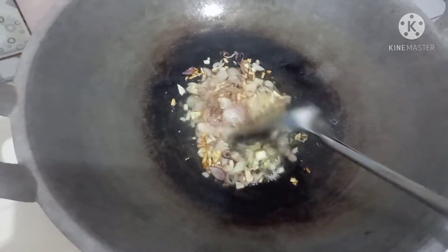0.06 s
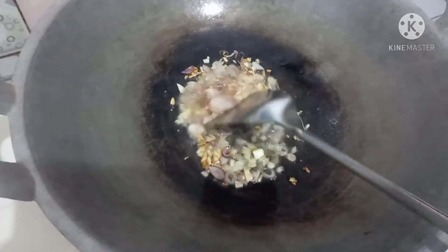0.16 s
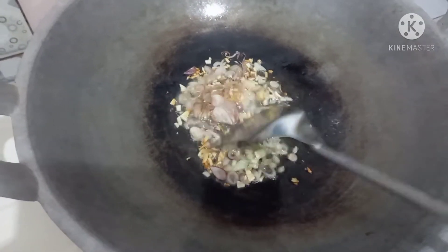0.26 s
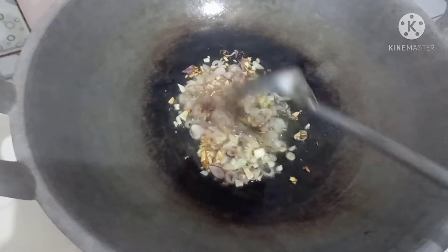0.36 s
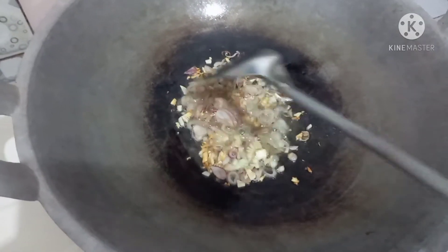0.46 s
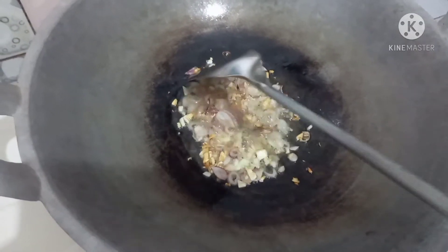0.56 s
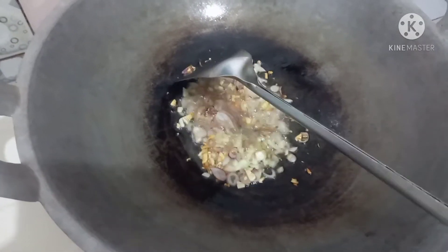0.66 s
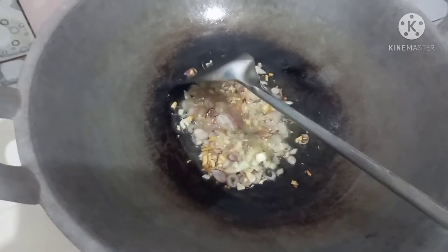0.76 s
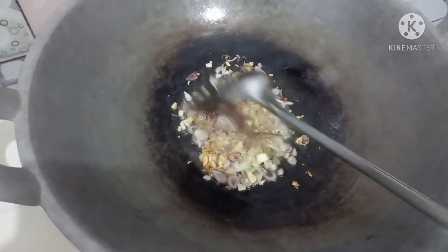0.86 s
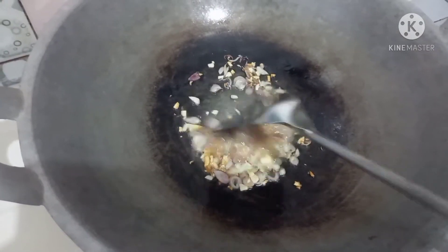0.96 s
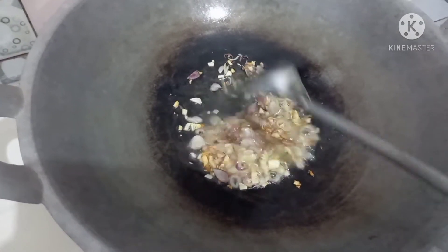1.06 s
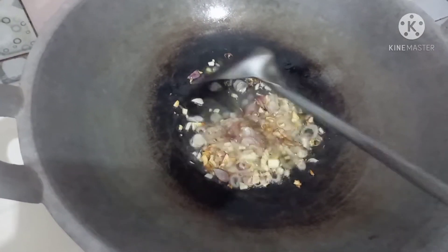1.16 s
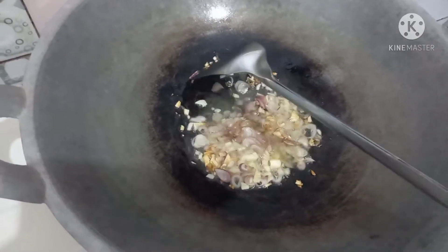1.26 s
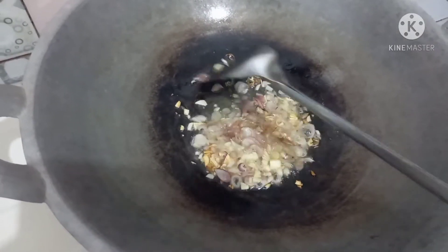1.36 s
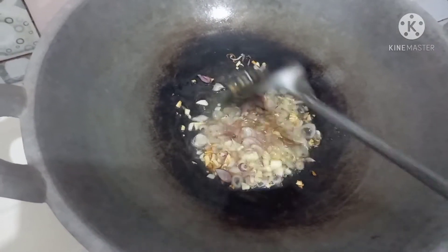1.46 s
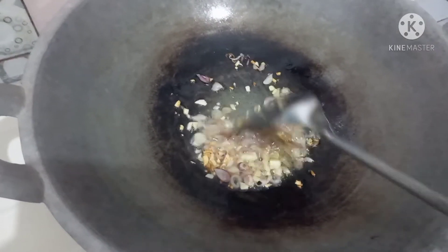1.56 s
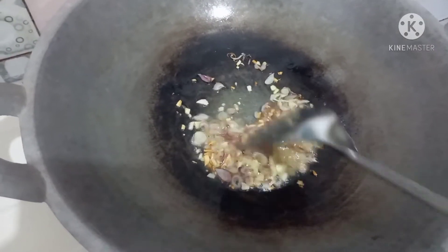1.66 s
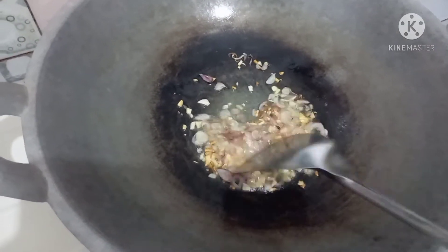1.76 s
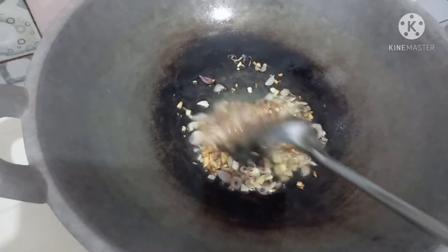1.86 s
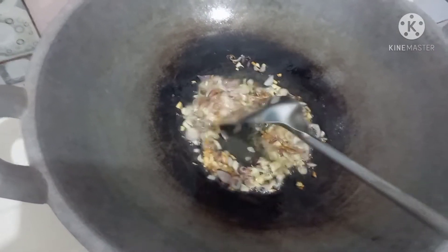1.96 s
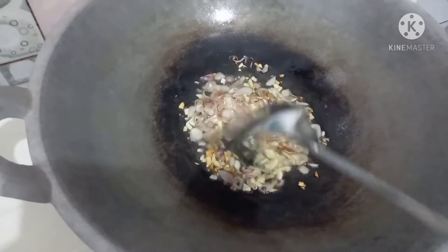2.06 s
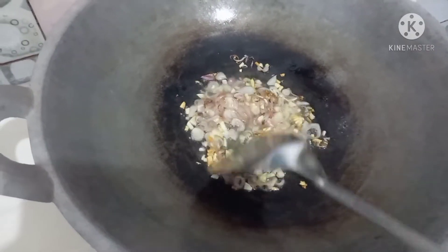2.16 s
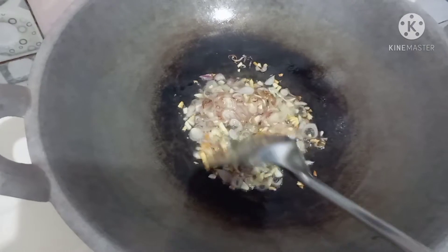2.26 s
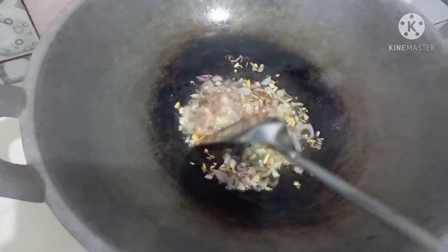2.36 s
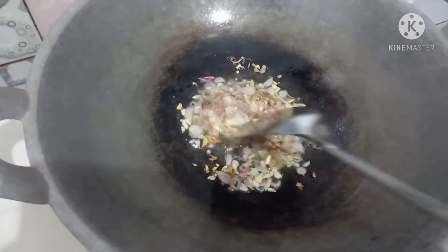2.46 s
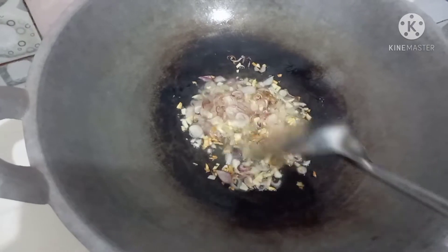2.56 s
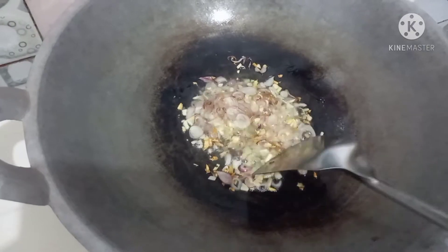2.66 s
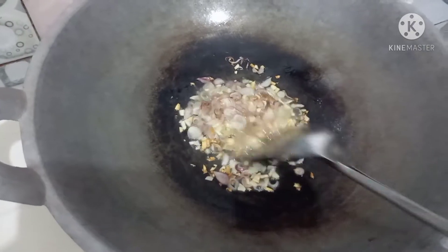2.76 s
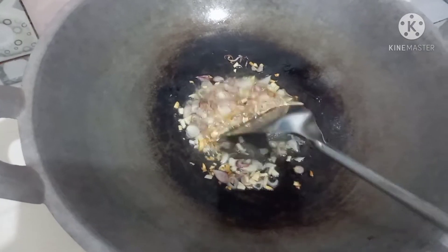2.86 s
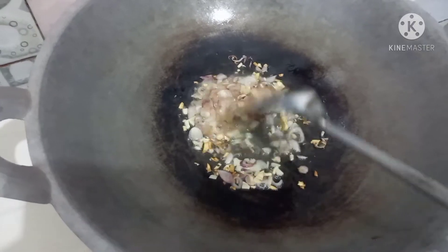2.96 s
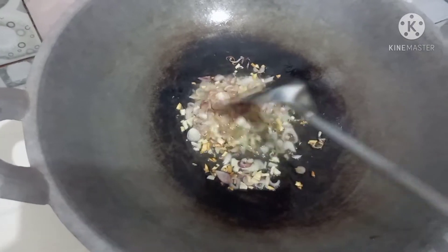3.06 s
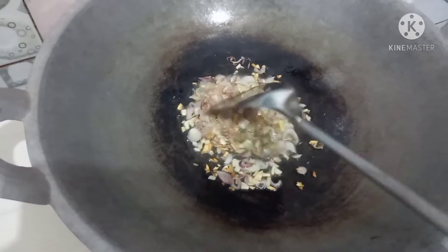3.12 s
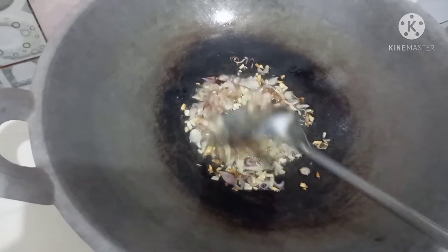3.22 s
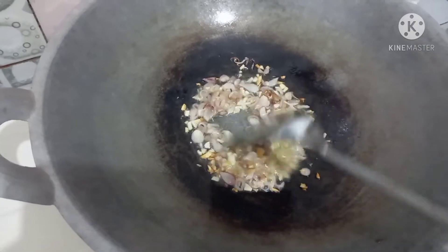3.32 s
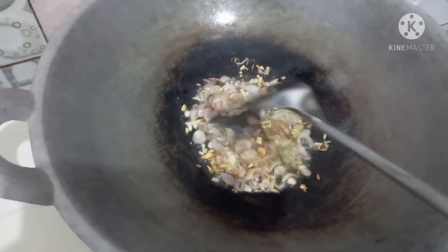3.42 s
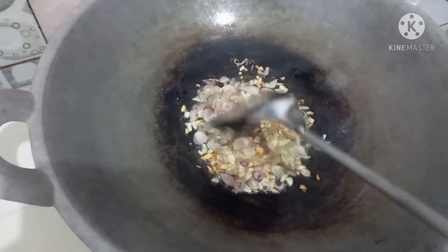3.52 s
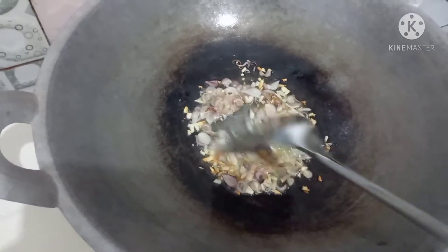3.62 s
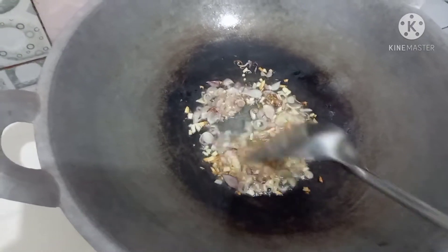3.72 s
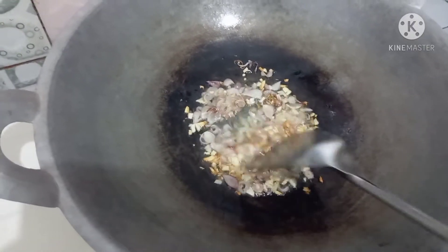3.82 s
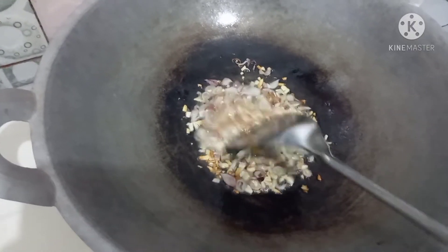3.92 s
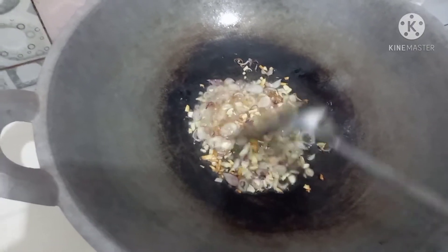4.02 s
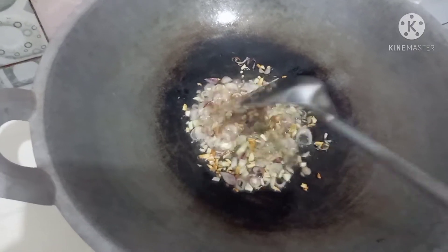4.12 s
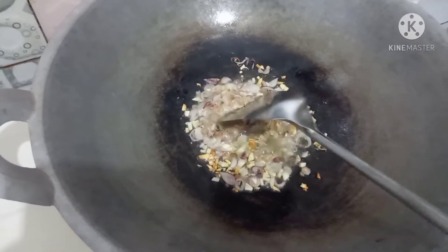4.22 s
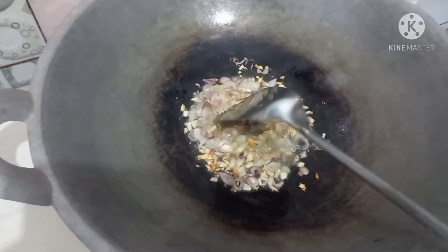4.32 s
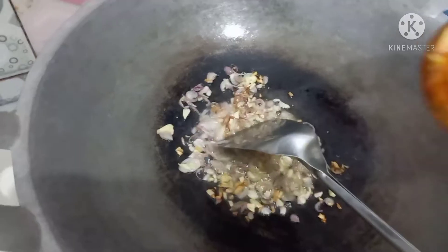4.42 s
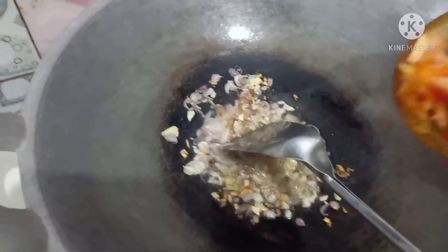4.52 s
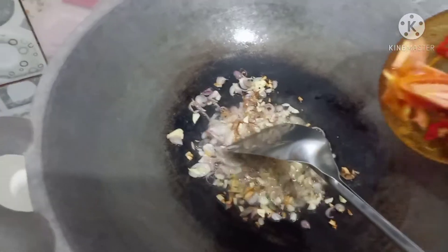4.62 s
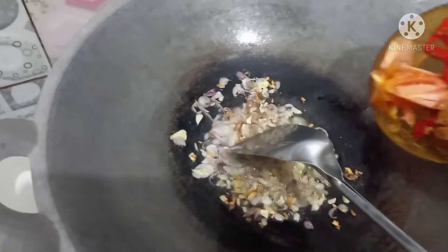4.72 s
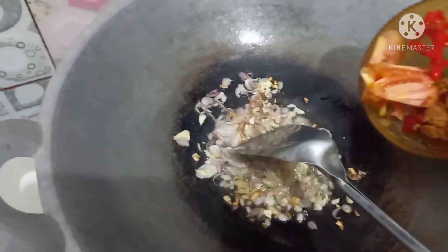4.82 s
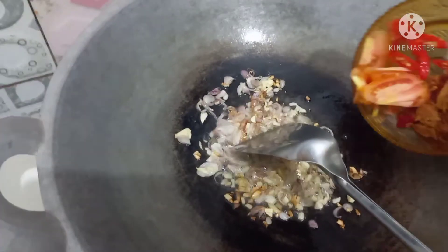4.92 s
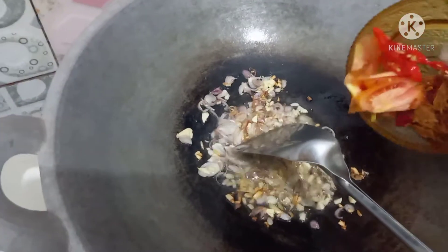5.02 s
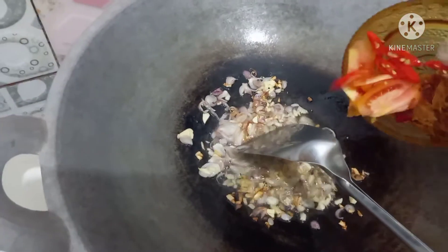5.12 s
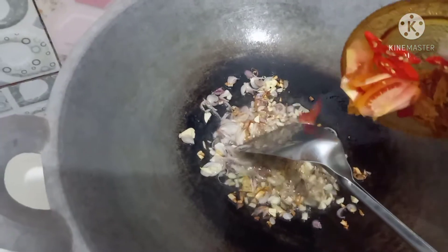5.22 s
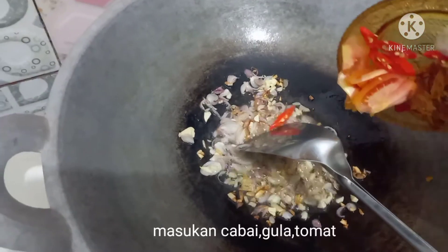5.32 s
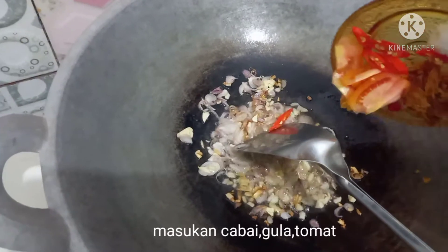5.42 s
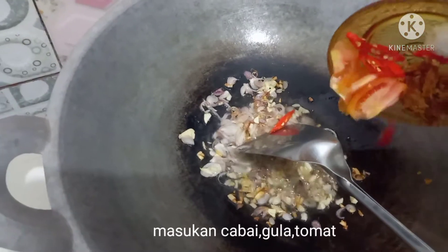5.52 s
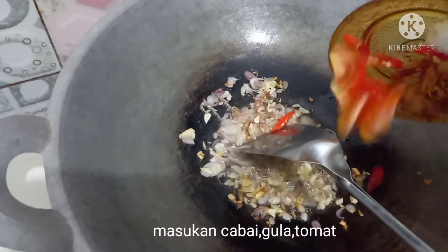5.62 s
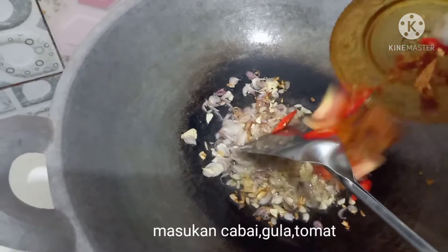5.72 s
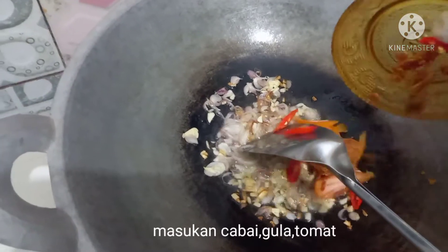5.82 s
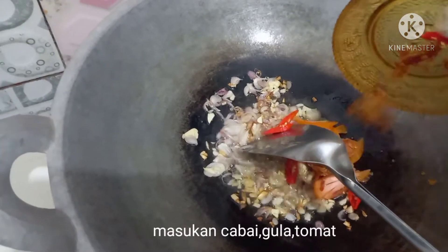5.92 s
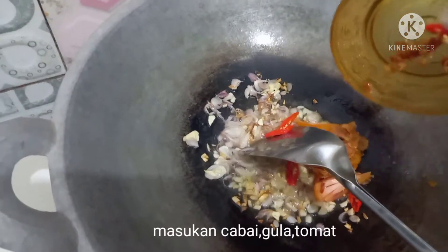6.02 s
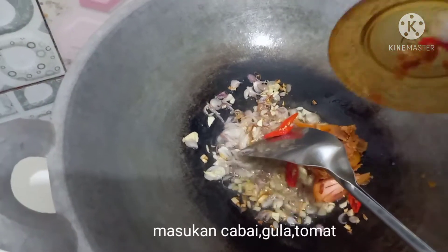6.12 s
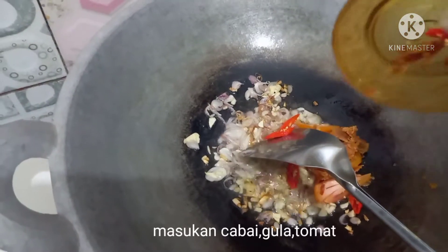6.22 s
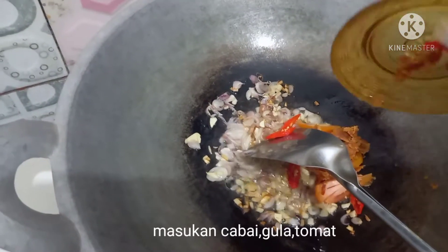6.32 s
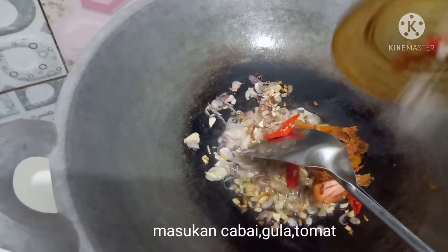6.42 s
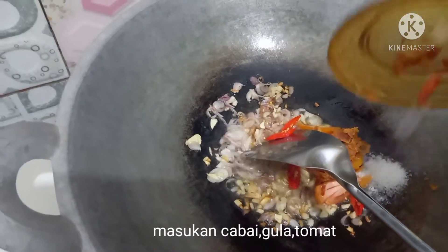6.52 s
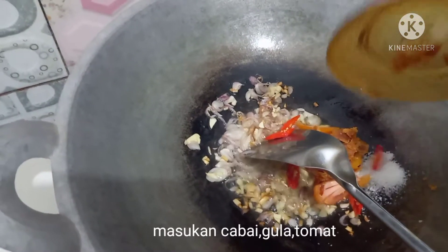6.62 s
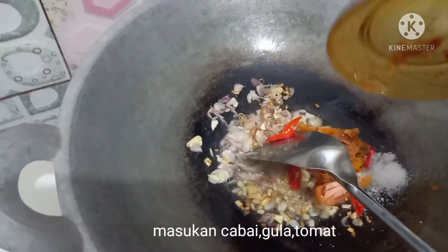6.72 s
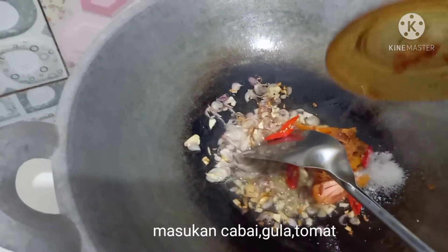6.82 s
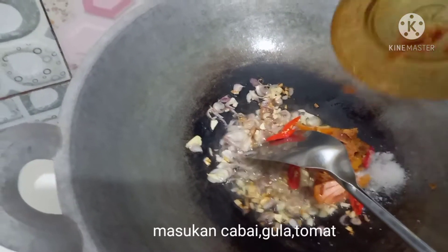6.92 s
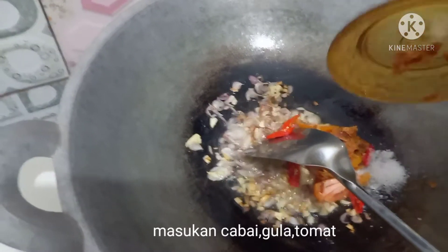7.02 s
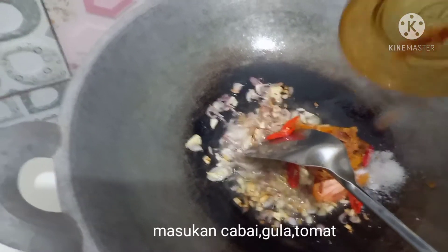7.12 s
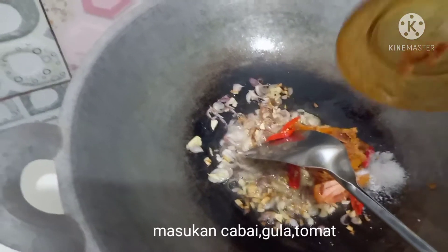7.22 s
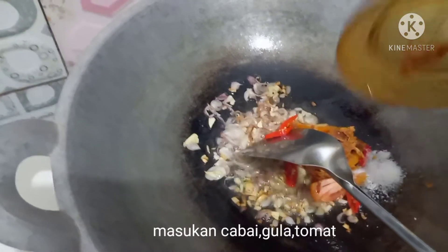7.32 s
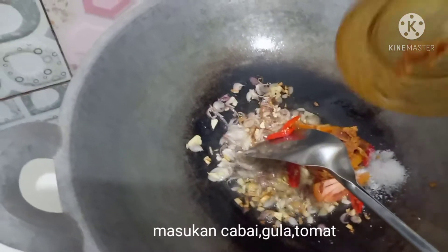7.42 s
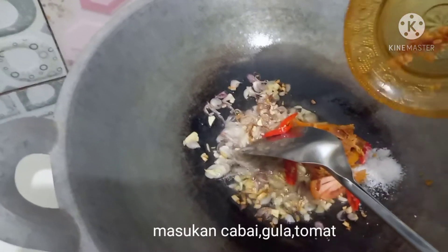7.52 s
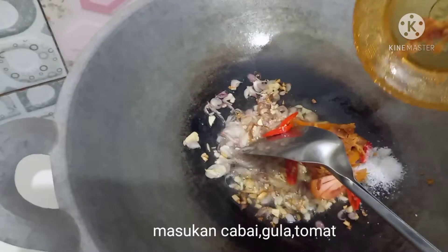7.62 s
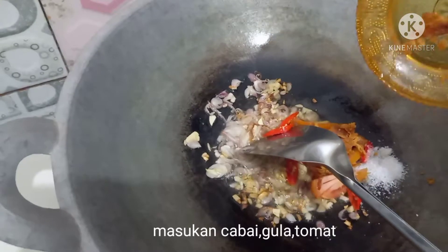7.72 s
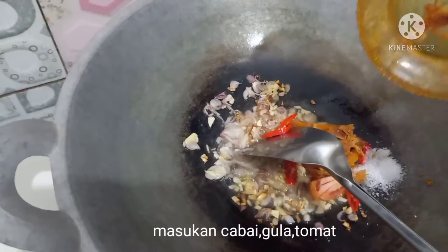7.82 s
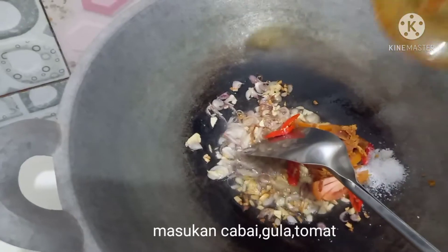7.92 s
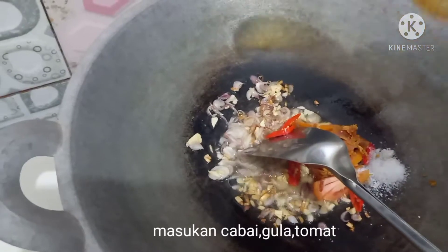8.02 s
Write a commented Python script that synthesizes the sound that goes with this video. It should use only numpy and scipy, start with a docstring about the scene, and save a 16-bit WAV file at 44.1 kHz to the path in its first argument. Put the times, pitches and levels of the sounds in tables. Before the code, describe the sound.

A stereo microphone just over the pan hears steady, hissy oil frying with little steam jets and snapping water drops. Short, high metallic squeaks and light knocks come from the stirring spatula for nearly five seconds. After a brief lull of plain sizzling, juicy pieces drop in, the wok rings briefly, and a fiercer, uneven sizzle erupts with harder cracks, many toward the left. Low stove hum is barely audible; room reflections are short.

```python
"""Chopped shallot and garlic fry in oil in a steel wok, heard from just above the pan by a stereo recorder:
thousands of tiny steam bubbles sum to the sizzle. Wet chilli and tomato land and it flares up in surges;
jets of steam and single water drops spit and crack. A metal spatula stirs, squeaking by stick and slip
and knocking the steel into ringing; the squeaks stop first. A stove rumbles and hums underneath."""
import sys
import numpy as np
from scipy import signal
from scipy.fft import rfft, irfft
from scipy.io import wavfile

SR = 44100
rng = np.random.default_rng(int(sys.argv[2]) if len(sys.argv) > 2 else 0)


def digitize_waveform(pressure):
    """Quantize a signal to 16-bit integers and store it at the path in sys.argv[1].

    Rows of a 2-D input are taken as channels; values are limited to [-1, 1].
    """
    field = np.atleast_2d(pressure).T
    bounded = np.clip(field, -1, 1)
    quanta = np.round(bounded * 32767).astype(np.int16)
    wavfile.write(sys.argv[1], SR, quanta)


N = 355887
TIME = np.arange(N) / SR
# top of the recorder's band, and of the bubbles' nominal pitches
TOP_HZ = 15600
# when the wet pieces reach the oil
LANDING_S = 5.8


def shallots(count=1500):
    """Steady fizz and sputter; there is more sputter while the spatula turns wet sides into the oil."""
    # colour of the shallot sizzle: [f/Hz, relative level/dB]
    shallot_colour = [(250, -57.5), (550, -21), (820, -19), (1150, -4), (1700, -3), (2600, 0), (4700, 0.5),
                      (6600, -5), (7500, -3.5), (9000, 1), (10600, 0), (12200, 1.5), (14300, -1.5),
                      (15500, -0.5)]
    swell_db, swells_per_s = 1.28, 9.7
    fine = unit(colour(fizz(count=85000), shallot_colour))
    coarse = unit(colour(sputter(count, spread_db=5.5, length_s=.003), shallot_colour))
    coarse = coarse * undb(-10.0 + 5.2 * stirring(TIME))
    swell = undb(swell_db * walk(swells_per_s, N))
    # slightly stronger on the right
    heat = shallot_gain(TIME) * swell * undb(np.array([[-.4], [.4]]))
    return in_pan(fine * heat) + in_pan(coarse * heat)


def shallot_gain(s):
    """The shallots quieten as their water boils off."""
    level_db, drying_db_per_s = -39, 0.35
    return undb(level_db - drying_db_per_s * s)


def stirring(s):
    """How busily the spatula moves, from 1 to 0."""
    eases_s, ends_s = 2.7, 4.4
    return np.interp(s, [eases_s, ends_s], [1, 0])


def tomato(pan_db=-2.0):
    """Wet pieces land at the right of the pan and boil in short volleys over a fizz."""
    # colour of the wet sizzle: [f/Hz, relative level/dB]
    tomato_colour = [(250, -32.5), (500, -28.5), (750, -15), (1100, -7.5), (1400, -7.5), (2300, -8.5),
                     (3100, -3.5), (4700, -2), (6400, -6.5), (7400, -6), (8600, 1), (10600, -3.5),
                     (12200, -1), (15500, -5)]
    fine = unit(colour(fizz(count=60000), tomato_colour))
    volleys = sputter(count=3400, spread_db=2.0, length_s=.0015, order=5)
    coarse = unit(colour(volleys, tomato_colour))
    heat = tomato_gain(TIME) * undb(np.array([[pan_db], [-pan_db]]) / 2)
    left, right = in_pan(fine * heat) + in_pan(coarse * heat)
    # the sound reaches the farther left port four samples later
    return np.array([np.roll(left, 4), right])


def tomato_gain(s):
    """Silent until the pieces land, then a quick flare and surge after surge as juice reaches the oil."""
    # how hard the wet pieces boil: [t/s, level/dB]
    boiling = [(5.79, -60), (5.82, -39), (5.87, -38), (5.93, -32.5), (5.98, -35.5), (6.04, -34),
               (6.12, -35.5), (6.2, -32.5), (6.36, -33.5), (6.42, -36), (6.46, -34.5), (6.52, -31),
               (6.56, -37), (6.61, -32.5), (6.71, -35), (6.76, -34), (6.79, -36), (6.87, -36),
               (6.98, -33.5), (7.07, -35.5), (7.17, -34.5), (7.21, -32), (7.255, -36.7), (7.285, -31),
               (7.39, -35.5), (7.44, -32.5), (7.53, -36), (7.57, -33), (7.61, -34.5), (7.67, -32),
               (7.8, -34.5), (7.835, -31.5), (7.96, -33.5), (8.05, -31.5)]
    return undb(np.interp(s, *np.transpose(boiling))) * (s > LANDING_S)


def fizz(count):
    """An even carpet of tiny steam bubbles."""
    when, pitch = rng.random((count, 2)).T
    return boil(when * N / SR, pitch * TOP_HZ, np.ones(count), life_s=.00009, scatter_db=1.0, lag_s=.00012)


def sputter(count, spread_db, length_s, order=18):
    """Pockets of juice flash to steam, each in a short volley of bubbles of like pitch."""
    when, pitch, strength, span = rng.random((count, 4)).T[:, :, None]
    gaps = rng.exponential(size=(count, order))
    s = when * N / SR + length_s * (span + .15) * gaps
    hz = np.abs(pitch ** .75 * TOP_HZ + 900 * rng.standard_normal((count, order)))
    violence = -np.log(strength + .04)
    # the fiercest volleys are the high-pitched ones
    size = undb(spread_db * violence * np.minimum(.6 + pitch, 1)) * np.ones(order)
    return boil(s.ravel(), hz.ravel(), size.ravel(), life_s=0.000086, scatter_db=1.0, lag_s=0.00014)


def spurts(count=170, pitch_spread=0.047):
    """Jets of steam: a crowd of bubbles that thins out as the pocket empties."""
    # the strongest jets: [t/s, nominal length/s, f/Hz, level/dB, left minus right/dB]
    jets = [(0.144, 0.01, 8300, -37.5, -2), (0.17, 0.008, 5500, -32.5, 3), (0.255, .008, 10000, -37.5, -2),
            (0.303, 0.0089, 8600, -32.5, -3), (.528, .008, 9500, -35.5, 0), (0.548, 0.016, 8200, -35.5, -3),
            (0.715, 0.007, 10500, -37, -1), (.793, .005, 3500, -39, 3), (.998, .005, 11000, -37, 0),
            (1.105, .006, 11500, -41, 0), (1.221, 0.0063, 10100, -35, 1), (1.255, 0.045, 11600, -36, -2),
            (1.354, 0.0051, 7900, -33, 1), (1.412, 0.034, 12000, -38, 0), (1.448, 0.017, 4700, -39.5, 3),
            (1.567, .007, 9900, -34, -4), (1.622, 0.037, 9600, -36.5, -1), (1.782, 0.007, 11000, -40, 2),
            (2.023, 0.0059, 10500, -38, -5), (2.049, 0.0087, 10400, -38, -2),
            (2.246, 0.0044, 8800, -31, -6), (2.688, 0.0092, 9500, -34, -4), (2.893, 0.012, 4940, -38, 5),
            (2.918, .006, 10600, -38, 0), (2.955, .009, 4970, -38.5, 1), (3.195, 0.0056, 10700, -36, 0),
            (3.338, .006, 12500, -37, -1), (3.627, .008, 12000, -43, -1), (4.178, .005, 10500, -38, 0),
            (4.354, 0.017, 4060, -37, 1), (4.848, 0.0032, 10000, -31, 1), (5.177, 0.0052, 8500, -35, -2),
            (5.515, 0.0032, 7800, -35, 1), (5.75, 0.01, 9000, -35.5, 2), (5.791, 0.004, 9800, -32.5, 1),
            (5.852, 0.033, 9000, -37, -6), (5.9, 0.049, 10500, -30, -3), (6.222, 0.036, 7500, -37, -2),
            (6.295, 0.013, 4240, -37.5, -8), (6.396, 0.0021, 9500, -25, -6), (6.444, 0.0093, 4500, -32, -2),
            (6.487, 0.0044, 8200, -25.5, -5), (7.193, 0.02, 8350, -32.5, 5), (7.65, .04, 3400, -35.5, -1),
            (7.794, 0.0031, 11200, -28, -7)]
    out = np.zeros((2, N))
    for s, length, hz, db, pan_db in jets:
        when = s + length * rng.triangular(0, .15, 1.4, count)
        pitch = hz * (1 + pitch_spread * rng.standard_normal(count))
        jet = boil(when, pitch, np.ones(count), life_s=.0001, scatter_db=2.5, lag_s=.0001)
        # rms over the nominal length, both channels together
        rms = np.sqrt(np.sum(jet ** 2) / (2 * length * SR))
        out += jet * undb(db + np.array([[pan_db], [-pan_db]]) / 2) / rms
    return out


def blisters(count=330, low_hz=1000, high_hz=5500, spread_db=4.0, gain_db=-2.5):
    """Bigger pockets of juice under the wet pieces burst with a coarser crackle; low ones are softer."""
    when, pitch, strength = rng.random((count, 3)).T
    s = LANDING_S + when * (TIME[-1] - LANDING_S)
    violence = -np.log(strength + .12)
    size = tomato_gain(s) * undb(gain_db + spread_db * violence) * (.5 + pitch / 2)
    hz = low_hz * (high_hz / low_hz) ** pitch
    return highpass(boil(s, hz, size, life_s=.0001, scatter_db=0.5, lag_s=.00005), 720)


def spits(count=520, spread_db=-1.5, gain_db=7, wet_db=-5):
    """Lesser drops tick one by one, louder as the pan gets wetter."""
    when, pitch, strength = rng.random((count, 3)).T
    s = when * (N - 1) / SR
    # most are near full size, a few up to 3.5 dB softer
    softness = -np.log(strength + .1)
    wetness = shallot_gain(s) + undb(wet_db) * tomato_gain(s)
    size = wetness * undb(gain_db + spread_db * softness)
    return highpass(boil(s, 3500 + 9500 * pitch, size, life_s=.00006, scatter_db=0.5, lag_s=.00004), 1070)


def pops(life_s=.00009, gain_db=-6.5, snap_db=-14, snap_hz=4000, snap_life_s=.00005,
         spatter_s=.0007, spatter_db=-11, count=4):
    """Water drops crack above the sizzle: a ping over a broader snap, then a spatter of smaller droplets."""
    # the loudest drops: [t/s, relative level/dB, f/Hz, left minus right/dB]
    drops = [(0.0564, -13, 8400, -1), (.1283, -11.5, 11200, 9), (0.1734, -14, 7650, -6),
             (0.181, -11.5, 11000, 0), (0.327, -11, 11900, -1), (0.3378, -9.5, 10000, -3),
             (.403, -17, 11500, 4), (0.439, -12, 11400, -4), (0.4895, -10.5, 10600, 2),
             (0.5116, -15, 8060, -4), (.524, -16, 9500, 0), (.6956, -21, 11200, -4), (.752, -19, 5500, 0),
             (0.847, -11, 9800, 0), (.925, -19, 9700, 1), (1.097, -13, 11800, -2),
             (1.1698, -12.5, 10900, 8), (1.2656, -17, 13100, 2), (1.653, -11, 8440, -2),
             (1.809, -21, 10500, -3), (1.826, -11, 12800, -9), (2.183, -12, 11200, -2),
             (2.274, -7.5, 9250, 2), (2.3166, -13, 11800, -3), (2.3842, -13.5, 6740, 8),
             (2.6136, -9, 10700, -5), (2.6817, -12, 9500, -8), (2.7174, -9, 11800, -2),
             (2.9998, -23, 10900, 0), (4.1366, -7, 12800, 1), (4.154, -16, 8600, -12),
             (4.2193, -15, 9500, -1), (4.5067, -6.5, 12500, -1), (4.54, -11.5, 8400, 5),
             (4.9, -18, 11500, 0), (4.9824, -9.5, 11900, 5), (5.2329, -12, 11600, 0),
             (5.4288, -15.5, 10100, 2), (5.841, -21, 1700, 2), (5.942, -3, 11000, -5),
             (6.028, -14, 1600, 2), (6.2, -19, 1700, 0), (6.2538, -8.5, 8900, -9), (6.331, -7, 12000, -8),
             (6.503, -17, 5500, -1), (6.513, -9.5, 9500, -10), (6.5674, -8, 9400, -9),
             (6.7126, -0.5, 10500, -9), (6.7435, 2.5, 10400, -4), (6.819, -15.5, 1390, 2),
             (6.928, -12.5, 1800, 4), (6.979, -16, 1600, 3), (7.011, -13, 9000, -3), (7.114, -11, 9500, -5),
             (7.125, -15, 1600, 2), (7.3063, -8, 10200, -9), (7.421, -15, 9500, -3), (7.658, -6, 9160, -9),
             (7.6813, -10, 9200, -5), (7.7105, -7.5, 9600, 0), (7.741, -10, 7500, 2), (7.776, -9, 8500, -4),
             (7.829, -5.5, 8000, -9), (7.899, -15, 1700, 2), (8.007, -5, 8950, -7)]
    s, db, hz, pan_db = np.transpose(drops)
    each = np.ones(len(s))
    lag = .00001 * rng.standard_normal(len(s))
    level = undb(db + gain_db)
    # begin one lifetime early, so that the swell peaks about the listed time
    ping = bursts(s - life_s, hz, level, life_s * each, pan_db, lag)
    snap = bursts(s - life_s, snap_hz * each, level * undb(snap_db), snap_life_s * each, pan_db, lag)
    spatter = np.zeros((2, N))
    for k in range(count):
        when = s + spatter_s * (k + rng.random(len(s))) / 2
        pitch = hz * rng.uniform(.8, 1.44, len(s))
        spatter += bursts(when, pitch, level * undb(spatter_db), life_s * each, pan_db, 3 * lag)
    return ping + snap + spatter


def boil(s, hz, size, life_s, scatter_db, lag_s):
    """Bubbles of unequal size and life, scattered across the pan."""
    size_draw, life_draw, pan, place = rng.standard_normal((len(s), 4)).T
    size = size * undb(scatter_db * size_draw)
    return bursts(s, hz, size, life_s * 2 ** (life_draw / 2), 3 * pan, lag_s * place)


def bursts(s, hz, size, life, pan_db, lag):
    """Bursting bubbles: each swells and dies in a moment, with its own lag between the two ports."""
    out = []
    for side in (1, -1):
        start = (s + side * lag / 2) * SR
        # each burst is followed for 64 samples
        index = np.ceil(start).astype(int)[:, None] + np.arange(64)
        age = ((index - start[:, None]) / SR).astype(np.float32)
        swell = age / life[:, None].astype(np.float32)
        wave = swell * np.exp(1 - swell) * np.cos(2 * np.pi * hz[:, None].astype(np.float32) * age)
        wave = wave * (size * undb(side * pan_db / 2))[:, None]
        out.append(np.bincount(np.clip(index, 0, N).ravel(), wave.ravel(), N + 1)[:N])
    return np.array(out)


def squeaks(wander_hz=140, wander_rate=450, flutter_db=5.0, grind_db=-10, gain_db=-2.1):
    """The blade sticks and slips on steel; pitch glides with the hand, grit breaks the tone into scraping."""
    # strokes: [t/s, length/s, start f/Hz, middle f/Hz, end f/Hz, relative level/dB, roughness 0-1]
    strokes = [ (.47, .05, 2200, 2080, 1900, -47, 0.3), (0.511, 0.13, 1863, 1994, 2250, -47, 0.25),
               (0.644, 0.099, 2220, 2130, 2020, -43.5, 0.06), (0.727, 0.068, 2040, 1940, 1820, -48, 0.16),
               (1.356, 0.071, 2330, 2600, 2680, -43, 0.5), (1.408, 0.1, 2494, 2550, 2380, -49, 0.64),
               (1.609, 0.029, 2930, 2790, 2780, -36.5, 0.1), (1.622, 0.044, 2760, 2750, 2780, -43, .15),
               (1.712, 0.036, 2740, 2790, 2790, -51, .2), (1.806, .068, 3140, 3210, 3220, -38.5, 0),
               (1.861, 0.026, 3220, 3220, 3200, -30.5, 0.05), (1.889, .09, 3220, 3240, 3200, -42, 0.16),
               (1.938, 0.034, 3020, 3060, 3100, -41, 0.6), (2.134, 0.12, 2795, 2640, 2670, -39, 0.3),
               (2.265, 0.065, 2515, 2480, 2430, -45, 0.02), (2.625, 0.065, 1890, 2130, 2180, -46, 0.8),
               (2.665, 0.031, 3250, 3320, 3330, -45, 0.8), (2.686, 0.086, 3350, 2740, 2240, -43.5, .55),
               (2.748, 0.089, 2240, 2110, 2030, -43, 0.52), (3.128, 0.048, 2980, 3130, 3200, -42, 0.7),
               (3.197, 0.085, 2910, 2880, 2800, -41, 0.2), (3.25, 0.059, 2710, 2700, 2640, -41.5, 0.3),
               (3.307, .06, 2500, 2460, 2450, -43, 0.78), (3.439, 0.11, 2797, 2822, 2860, -38.5, 0.18),
               (3.661, 0.054, 2790, 3130, 3280, -41, 0.6), (3.771, 0.078, 2930, 2950, 2930, -44, 0.8),
               (4.029, 0.069, 2730, 3000, 2930, -39.5, 0.45), (4.1, 0.073, 2940, 2930, 2910, -48, 0.45),
               (4.189, 0.12, 2550, 2460, 2520, -48, 0.27), (4.623, 0.11, 1990, 1850, 1820, -51, 0.33),
               (4.697, 0.11, 1840, 2030, 2240, -48, 0.2), (4.75, 0.12, 2156, 2185, 2180, -42, 0.04),
               (4.843, 0.058, 2195, 2086, 1950, -40, 0.27), (4.893, 0.066, 2030, 2010, 2010, -46, 0.43)]
    # pressure builds and eases over these shares of the length
    attack, release = 0.093, 0.43
    # a soft echo of each squeak follows about 30 ms later
    echo_s, echo_db = .03, -12
    grit_db = -5
    out = np.zeros((2, N))
    for s, length, start_hz, middle_hz, end_hz, db, rough in strokes:
        size = int(length * SR)
        along = np.linspace(0, 1, size)
        path = np.polyval(np.polyfit([0, .5, 1], [start_hz, middle_hz, end_hz], 2), along)
        pressure = np.clip(along / attack, 0, 1) * np.clip((1 - along) / release, 0, 1)
        pressure = undb(db + gain_db) * pressure
        for delay, strand_db in ((0, 0), (echo_s, echo_db)):
            phase = 2 * np.pi * np.cumsum(path + rough * wander_hz * walk(wander_rate, size)) / SR
            grip = undb(flutter_db * np.sqrt(rough) * walk(164.0, size))
            tone = unit(grip * np.sin(phase + np.array([[0], [.6]])))
            grind = unit(grip * resonate(rng.standard_normal((2, size)), path.mean(), 1100))
            rub = np.sqrt(1 - rough / 2) * tone + undb(grind_db) * np.sqrt(rough) * grind
            add(out, s + delay, undb(strand_db) * pressure * rub)
        add(out, s, undb(grit_db) * np.sqrt(rough) * pressure * grit(size))
    return out


def grit(size):
    """The edge catches on crumbs in a quick, uneven run of ticks."""
    catches_per_s, centre_hz, width_hz = 450, 2700, 2000
    catches = (rng.random(size) < catches_per_s / SR) * rng.uniform(0.27, 1, size)
    t = np.arange(SR // 100) / SR
    tick = rng.standard_normal((2, len(t))) * fade(t, 0.0031)
    ticks = convolve(np.array([catches, catches]), tick)
    return unit(highpass(resonate(ticks, centre_hz, width_hz), 1040))


def taps(click_t60=0.004, click_width=0.9):
    """Each knock, pop or crackle is a short noisy click at its own pitch that leaves the wok ringing."""
    # knocks on the wok, with some short pops and low crackles among them:
    # [t/s, click peak level/dB, relative ring level/dB, click f/Hz]
    contacts = [(0.0125, -10, -61, 7950), (0.056, -23, -68, 2870), (.328, -18.5, -79, 3800),
                (.362, -16.5, -64, 5200), (.752, -31, -64.5, 4000), (1.049, -29, -78, 3460),
                (1.323, -21, -77, 3200), (1.356, -23, -70, 3500), (1.5932, -9.5, -64, 4700),
                (1.611, -15, -65, 3000), (1.807, -23, -77, 3270), (1.928, -26, -67, 2000),
                (2.615, -31, -70, 1600), (3.001, -24, -73, 2400), (3.207, -21, -75, 2400),
                (3.263, -25, -72, 2600), (3.281, -25, -63, 2500), (3.408, -11.5, -63.5, 4550),
                (3.449, -25, -67, 2000), (3.5, -23.5, -76, 2200), (3.634, -24, -80, 3600),
                (3.858, -23.5, -80, 1820), (3.932, -21, -82, 2500), (3.981, -25.5, -80, 1800),
                (4.006, -21, -82, 4500), (4.339, -23, -62, 2600), (5.263, -24.5, -85, 4000),
                (5.622, -18, -85, 6400), (6.09, -7, -42.5, 3640), (6.097, -12, -64, 7040),
                (6.146, -6.5, -57, 3960), (6.262, -18, -58, 2500), (6.283, -23, -62, 1900),
                (6.353, -36, -55.5, 1400), (6.437, -19, -56, 2500), (6.888, -22, -59, 2000),
                (7.714, -13.5, -57, 2100)]
    out = np.zeros((2, N))
    t = np.arange(SR // 20) / SR
    for s, click_db, ring_db, hz in contacts:
        # partly shared by the two ports
        noise = rng.standard_normal(len(t)) + 1.32 * rng.standard_normal((2, len(t)))
        click = highpass(resonate(noise * fade(t, click_t60), hz, hz * click_width), 950)
        add(out, s, undb(click_db) * click / np.abs(click).max())
        add(out, s, undb(ring_db) * wok_ring())
    return out


def wok_ring():
    """The bowl's decaying modes, weighted anew at each call."""
    # modes of the wok: [f/Hz, relative level/dB, t60/s]
    modes = [(265, -17, 0.2), (356, -11, 0.22), (630, -16, 0.45), (754, -5, 0.45), (883, 1, 0.45),
             (908, 4, .1), (965, 6, 0.04), (1060, 4, .035), (1190, -15, .1), (1572, -16, 0.25),
             (1965, -8, 0.25), (2056, -9, .2), (2814, -12, 0.2), (3219, -11, .2)]
    t = np.arange(SR // 2) / SR
    ring = np.zeros((2, len(t)))
    for hz, db, t60 in modes:
        tone = np.sin(2 * np.pi * hz * t + .5 * rng.standard_normal((2, 1)))
        ring += undb(db + rng.standard_normal()) * fade(t, t60) * tone
    return ring


def singing(waver_hz=35):
    """One mode of the wok swells briefly near the end, as if lightly rubbed."""
    start_s, length_s, centre_hz, level_db = 7.912, .16, 891, -50
    swell = np.sqrt(np.abs(np.sin(np.pi * np.clip((TIME - start_s) / length_s, 0, 1))))
    phase = 2 * np.pi * np.cumsum(centre_hz + waver_hz * walk(200, N)) / SR
    return undb(level_db) * swell * unit(np.sin(phase))


def stove(rumble_db=-64, side_db=-5.0):
    """Low rumble of coloured noise and a wavering hum; bumps, swells and a plop from the pan join in."""
    # colour of the rumble: [f/Hz, relative level/dB]
    stove_colour = [(20, -24), (32, -18), (50, -5), (85, 1), (150, -3.5), (200, -11.5), (340, -11.5),
                    (480, -21), (800, -19), (1500, -30)]
    # stove drone: [f/Hz, level/dB]
    hum = [(104, -66), (130, -74), (356, -87)]
    # dull bumps, low swells and one short wet plop from the pan: [t/s, f/Hz, length/s, level/dB]
    bumps = [(0.629, 80, 0.25, -64.5), (2.598, 127, 0.83, -66.5), (3.956, 225, 0.055, -54.5),
             (4.021, 133, 0.26, -62.5), (4.749, 100, 0.27, -61), (5.76, 143, 0.14, -59),
             (6.081, 355, .045, -52.5), (6.344, 1140, .018, -42), (6.403, 55, 0.046, -56),
             (6.619, 81.4, 0.12, -56)]
    sides = rng.standard_normal(N) * np.array([[1], [-1]])
    air = rng.standard_normal(N) + undb(side_db) * sides
    out = undb(rumble_db) * unit(colour(air, stove_colour))
    for hz, db in hum:
        tone = unit(np.sin(2 * np.pi * hz * TIME + .5 * walk(12, N)))
        out += undb(db + 0.25 * walk(14, N)) * tone
    for s, hz, length, db in bumps:
        size = int(length * SR)
        body = resonate(resonate(rng.standard_normal(SR), hz, hz * 0.32), hz, hz * 0.32)[-size:]
        add(out, s, undb(db) * unit(body * np.sqrt(np.hanning(size))))
    return out


def in_pan(x):
    """Bubbles keep the steel faintly ringing and echo from the bowl and the walls."""
    ringing = undb(-59) * convolve(x, wok_ring())
    return surroundings(x + ringing, bowl_db=-12, bowl_t60=.012, room_db=-12, room_t60=.2)


def surroundings(x, bowl_db, bowl_t60, room_db, room_t60):
    """Quick reflections inside the bowl, then the soft tail of a tiled kitchen, as decaying noise."""
    t = np.arange(SR // 2) / SR
    response = np.zeros((2, len(t)))
    response[:, 0] = 1
    for db, t60, delay in ((bowl_db, bowl_t60, .0006), (room_db, room_t60, .006)):
        tail = rng.standard_normal((2, len(t))) * fade(t, t60) * (t > delay)
        response += undb(db) * unit(tail) / np.sqrt(len(t))
    return convolve(x, response)


def undb(db):
    """Decibels to gain."""
    return 10 ** (np.asarray(db) / 20)


def unit(x):
    """Scale to rms 1."""
    return x / np.sqrt(np.mean(x ** 2) + 1e-20)


def add(out, s, x):
    """Mix x into out from time s on."""
    i = max(int(s * SR), 0)
    out[:, i:i + x.shape[-1]] += x[..., :N - i]


def convolve(x, response):
    """Pass both channels through a response."""
    return signal.fftconvolve(x, np.atleast_2d(response), axes=1)[:, :x.shape[1]]


def colour(x, points):
    """Causal minimum-phase filter with the given (Hz, dB) shape."""
    hz, db = np.transpose(points)
    size = 4096
    grid = np.fft.rfftfreq(size, 1 / SR)
    cepstrum = irfft(np.log(undb(np.interp(np.log(grid + 1), np.log(hz), db))))
    # folding the cepstrum makes the response causal
    cepstrum[1:size // 2] *= 2
    cepstrum[size // 2 + 1:] = 0
    return convolve(x, irfft(np.exp(rfft(cepstrum))))


def resonate(x, hz, width_hz):
    """One resonance, gain 1 at its centre."""
    return signal.lfilter(*signal.iirpeak(hz, hz / width_hz, fs=SR), x)


def highpass(x, hz):
    """Small things radiate little bass."""
    return signal.sosfilt(signal.butter(4, hz, "highpass", fs=SR, output="sos"), x)


def walk(rate, size):
    """Smooth random wander with a spread near 1, drawn anew `rate` times a second."""
    points = rng.standard_normal(size)
    return np.interp(np.arange(size) * rate / SR, np.arange(size), points) * np.sqrt(3 / 2)


def fade(t, t60):
    """Exponential decay by 60 dB in t60 seconds."""
    return np.exp(-np.log(1000) * t / t60)


def scene():
    """Everything in the pan but the plop shares the bowl and the kitchen; the stove is added as it is."""
    drops = highpass(pops(), 930) + spits() + blisters()
    cracks = surroundings(drops, bowl_db=-7, bowl_t60=.011, room_db=-9.5, room_t60=.11)
    knocks = surroundings(taps(), bowl_db=-6, bowl_t60=.016, room_db=-8.5, room_t60=.17)
    rubbed = surroundings(squeaks() + singing(), bowl_db=-26, bowl_t60=.02, room_db=-6, room_t60=0.36)
    jets = in_pan(highpass(spurts(), 1800))
    return shallots() + tomato() + jets + cracks + knocks + rubbed + stove()


def record(dry):
    """The air cavity of each microphone port adds its own treble resonance; the top is cut."""
    # left and right port: [f/Hz, width/Hz, level/dB]
    ports = [(9800, 280, -12), (8090, 340, 0.5)]
    heard = np.array([x + undb(db) * resonate(x, hz, width) for x, (hz, width, db) in zip(dry, ports)])
    return signal.sosfilt(signal.ellip(10, .2, 70, TOP_HZ, fs=SR, output="sos"), heard)


dry = scene()
out = record(dry)
digitize_waveform(out)
```